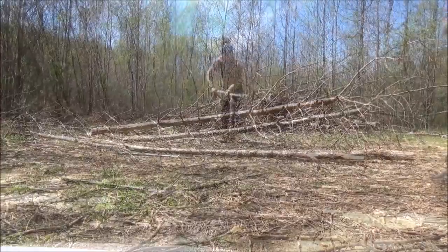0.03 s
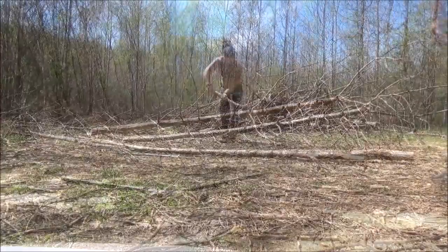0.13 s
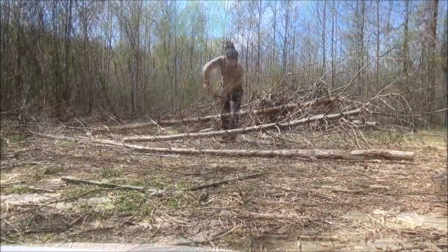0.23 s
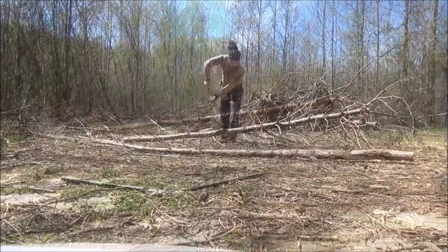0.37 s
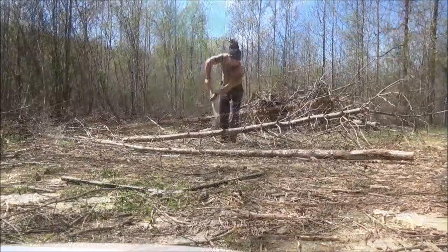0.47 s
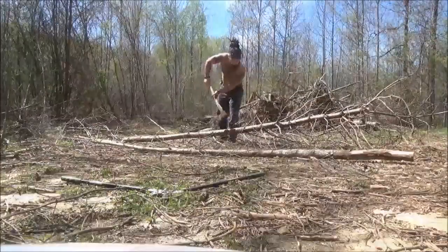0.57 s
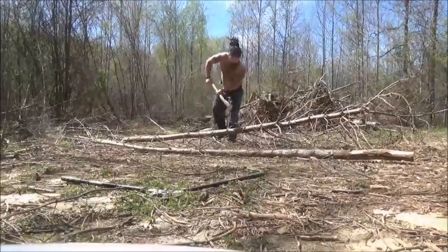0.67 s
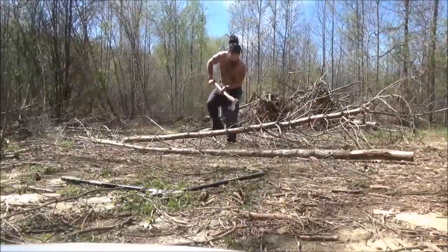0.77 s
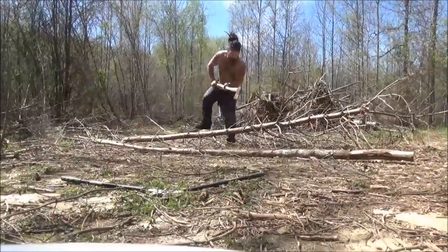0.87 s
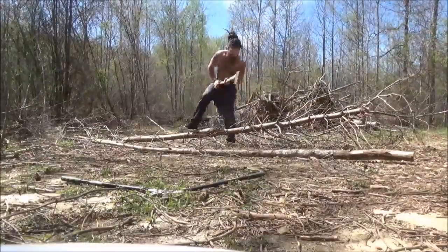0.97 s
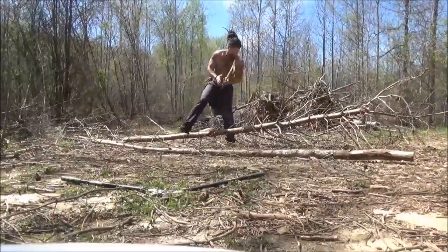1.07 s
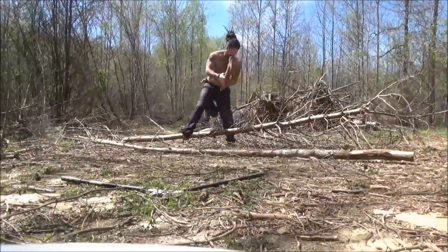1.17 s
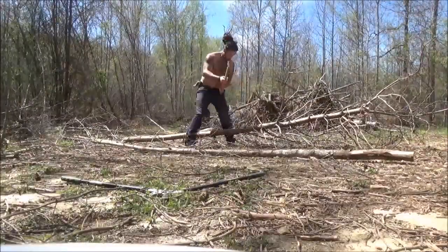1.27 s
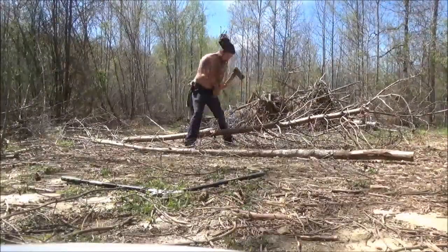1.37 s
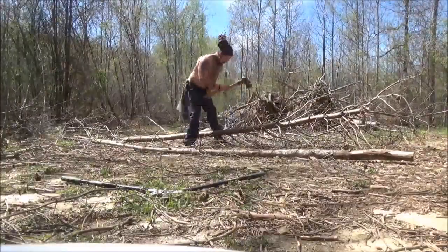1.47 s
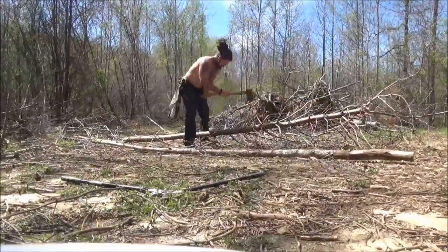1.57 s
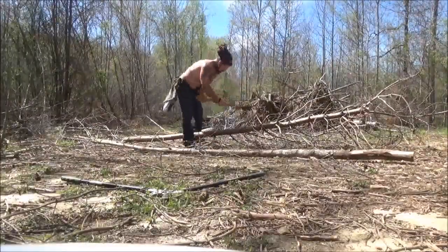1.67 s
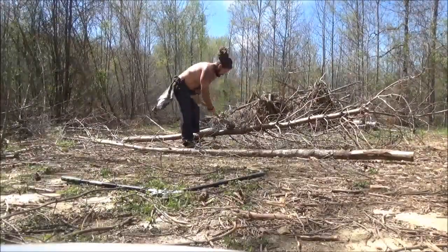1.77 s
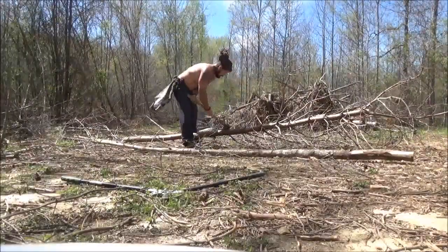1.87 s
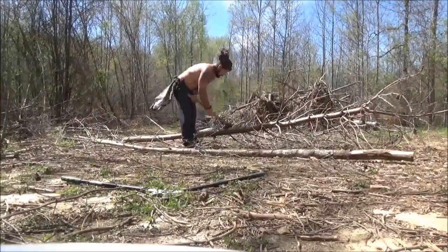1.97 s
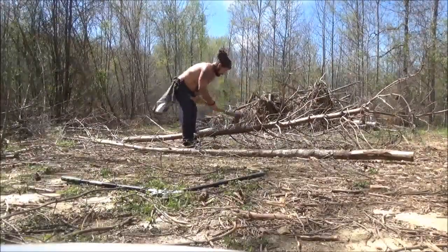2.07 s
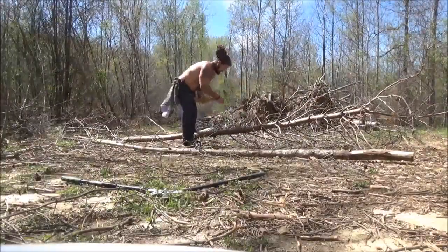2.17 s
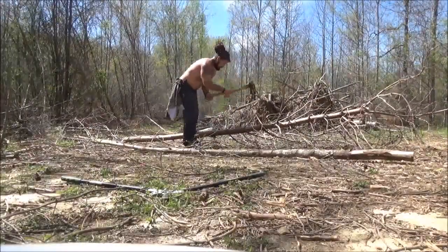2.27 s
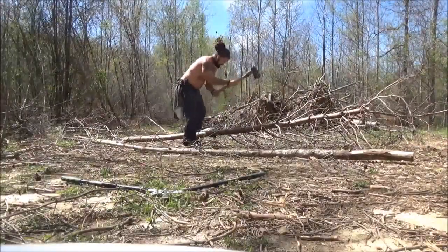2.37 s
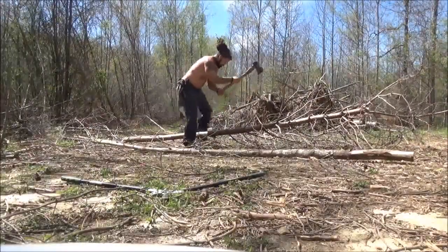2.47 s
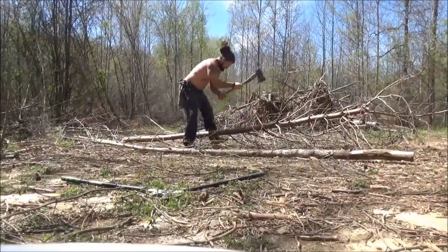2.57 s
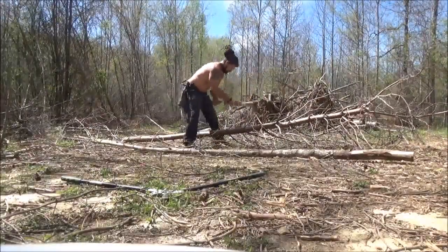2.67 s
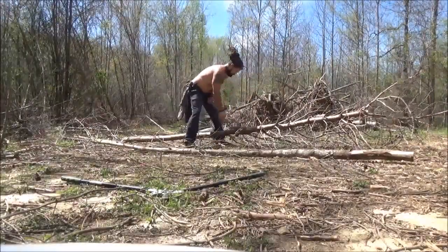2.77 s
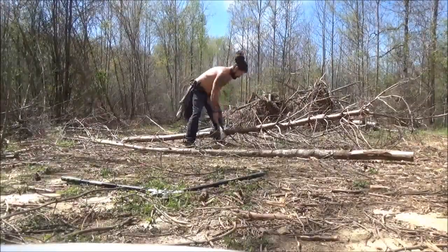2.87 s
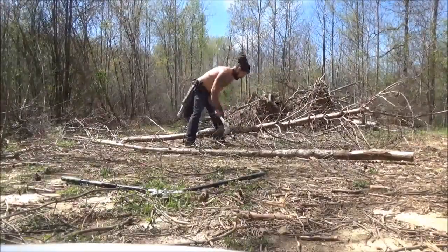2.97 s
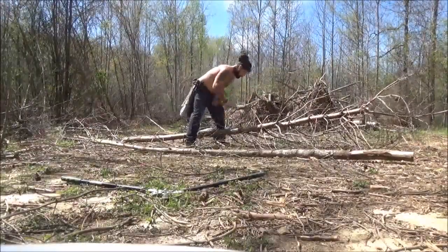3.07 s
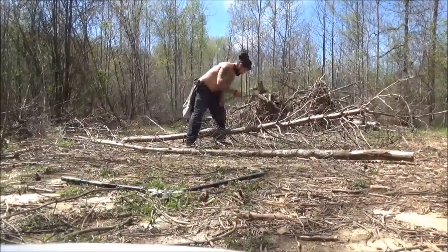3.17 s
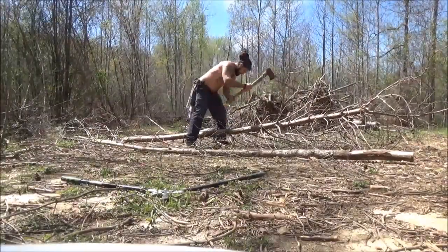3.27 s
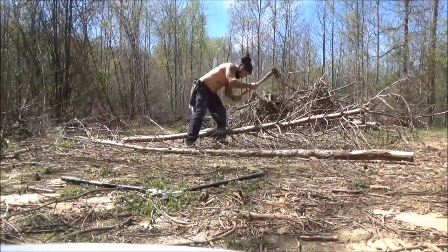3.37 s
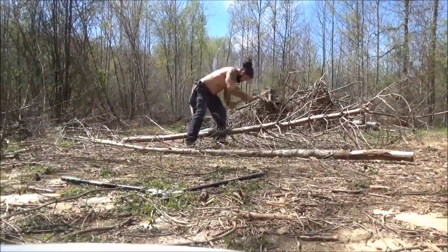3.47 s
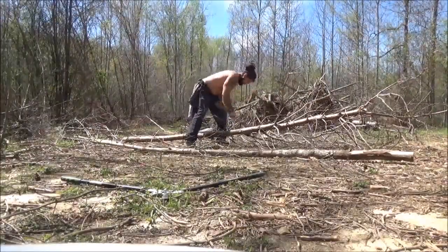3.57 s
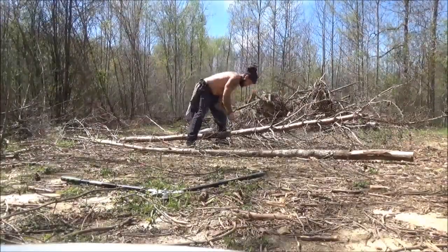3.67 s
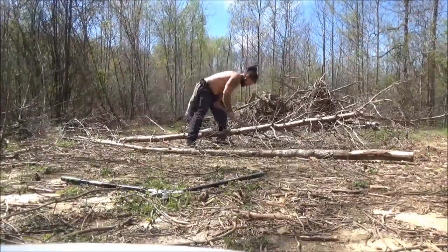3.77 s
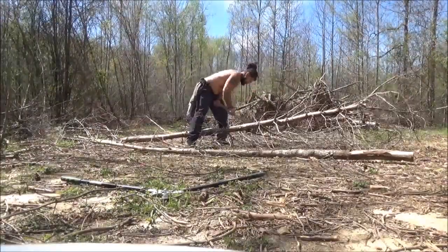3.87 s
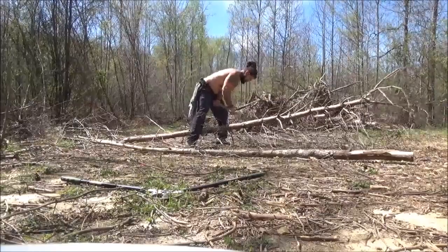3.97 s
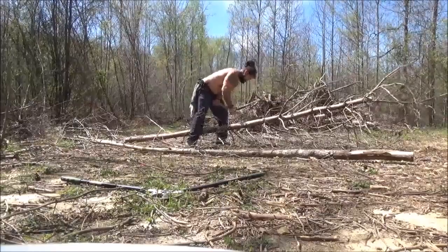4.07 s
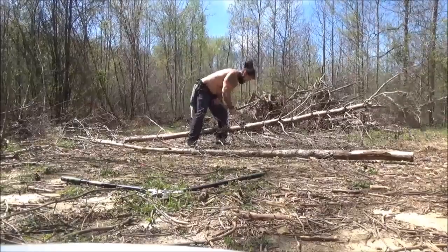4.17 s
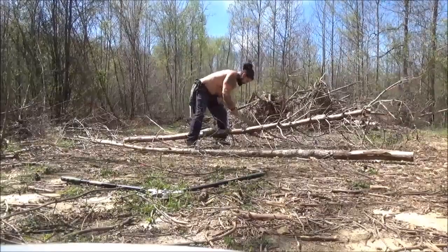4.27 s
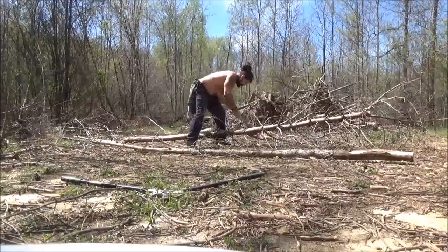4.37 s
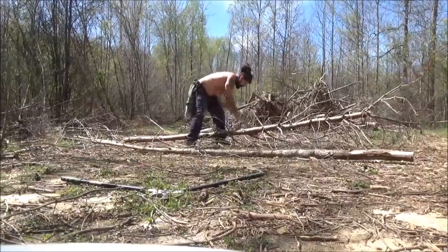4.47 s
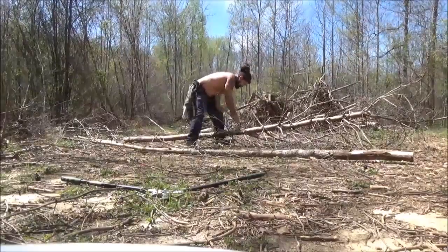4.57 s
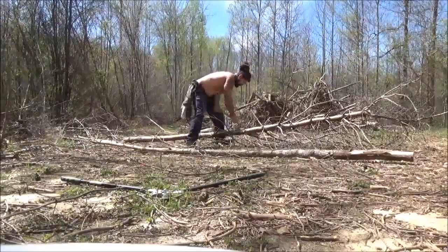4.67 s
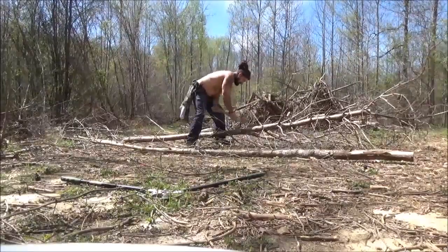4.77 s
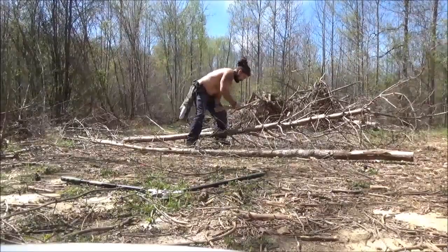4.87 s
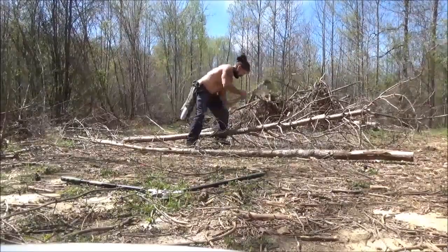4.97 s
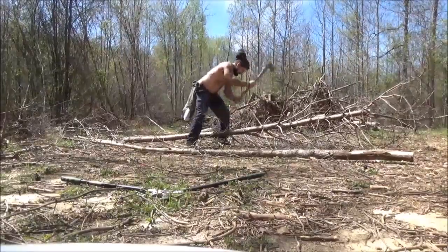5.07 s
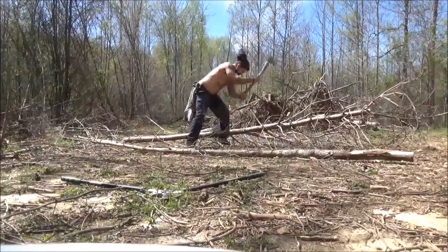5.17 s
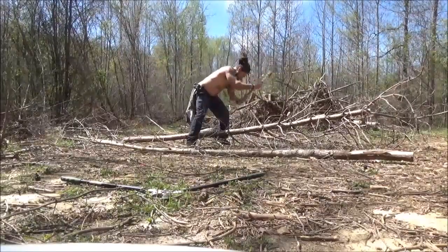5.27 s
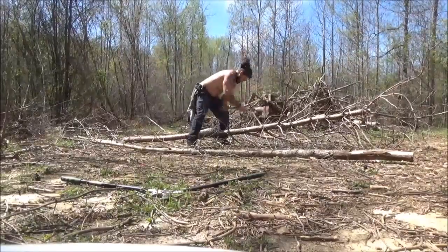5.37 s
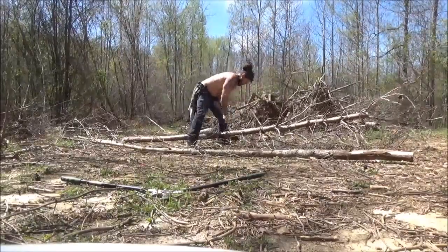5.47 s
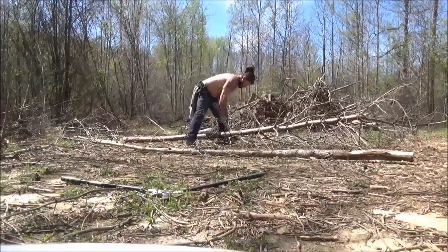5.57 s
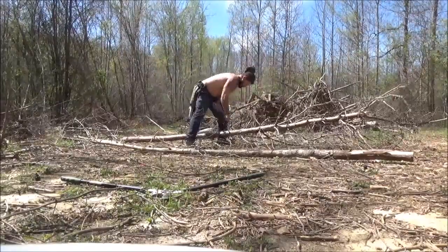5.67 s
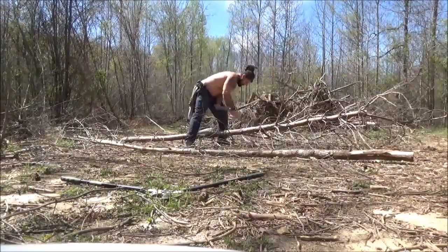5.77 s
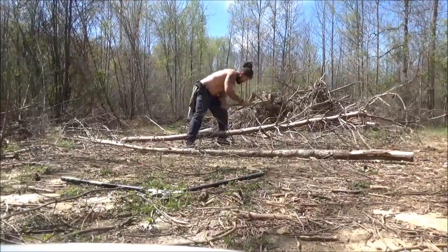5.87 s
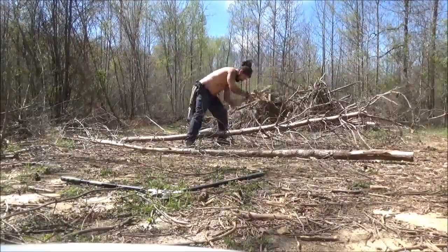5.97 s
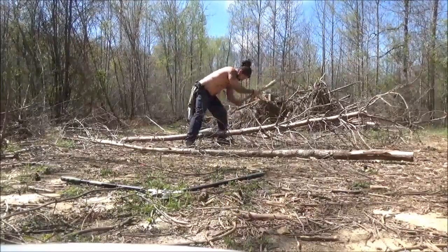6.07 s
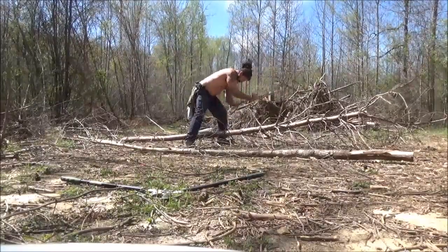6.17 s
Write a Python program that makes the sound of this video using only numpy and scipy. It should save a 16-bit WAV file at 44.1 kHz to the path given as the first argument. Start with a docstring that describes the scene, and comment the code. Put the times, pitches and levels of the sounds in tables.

```python
"""A man steps through dry brush in a forest clearing, with dull dry clicks close by, under still air and a low far hum.
He chops limbs off a felled tree: each blow is a burst of noise (torn fibres), then dying tones (the knocked limb).
The trees answer with a long wash of noise that follows the energy of each blow.
Between blows, twigs snap as short bursts, branches rustle as many tiny breaks, and loose limbs bump the ground.
The last blow lands as several bites close together, and the shaken branches die away."""
import sys
import numpy as np
from scipy import signal
from scipy.fft import rfft, irfft
from scipy.io import wavfile

SR = 44100
rng = np.random.default_rng(int(sys.argv[2]) if len(sys.argv) > 2 else 0)


def transcribe(signal):
    """Save signal, clipped to [-1, 1], as a 16-bit WAV file at the path in sys.argv[1]."""
    frames = np.atleast_2d(signal).T
    limited = np.clip(frames, -1, 1)
    pcm = np.round(limited * 32767).astype(np.int16)
    wavfile.write(sys.argv[1], SR, pcm)


N = 274302  # length in samples
EDGE_HZ = 11250  # upper limit of the sound band

# bites of the blade, some swings biting more than once; a first knock as the edge meets the wood, a full one as it stops:
# (start_s, echo_db, (crack_db, crack_length_s, crack_tilt_db_per_octave), (first_knock_db, first_pitch_hz),
#  (full_knock_db, full_pitch_hz, full_tilt_db_per_octave, trunk_share_db))
CHOPS = [(.2865, -2, (-30.5, 0.018, 0), (-14.5, 364), (-15.5, 878, 13, -16)), (1.834, -1, (-25, 0.013, 0),
         (-17.5, 640), (-12, 529, 4, -12)), (1.8525, -4.5, (-17.5, 0.0071, 0), (-24, 880),
         (-10, 846, 2.5, -13)), (2.8076, 1, (-16.5, 0.0086, 1), (-26, 1100), (-15, 937, 2, -1)),
         (3.6491, 7, (-13, 0.0034, 0.91), (-11.5, 1190), (-9, 803, -2, -10)),
         (5.498, -6, (-13.5, 0.0038, -4), (-15, 750), (-15, 638, 5, -23)),
         (5.5052, 4.5, (-15.5, 0.0058, 0.17), (-17, 740), (-9, 658, 17, -9.5)),
         (5.567, 4, (-23, 0.008, -1.1), (-36, 720), (-26, 640, -6, -13)),
         (5.5761, -16, (-21.5, 0.0044, -2.5), (-32, 550), (-17.5, 552, 3, -13))]


def amp(db):
    """Turns decibels into gain."""
    return 10 ** (np.asarray(db) / 20)


def evened(x):
    """Scales a signal to an average strength (rms) of 1."""
    return x / np.sqrt(np.mean(x ** 2) + 1e-20)


def read(points, hz):
    """Reads a table between its points, with frequency on a log axis as in hearing."""
    f, value = np.transpose(points)
    return np.interp(np.log(hz + 1), np.log(f), value)


def add(mix, s, sound):
    """Mixes a sound in at time s, cutting off what runs past the end."""
    part = mix[..., max(round(s * SR), 0):][..., :sound.shape[-1]]
    part += sound[..., :part.shape[-1]]


def panned(x, side_db):
    """Places a sound by its level difference between left and right; positive is left."""
    return x * amp([[side_db / 2], [-side_db / 2]])


def coloured(x, points):
    """Makes each frequency louder or softer by a spectrum table."""
    hz = np.fft.rfftfreq(x.shape[-1], 1 / SR)
    return irfft(rfft(x) * amp(read(points, hz)), x.shape[-1])


def scattered(pair):
    """Turns two unrelated signals into partly alike left and right, as sound from all around reaches two ears."""
    # likeness of the two ears: (pitch_hz, likeness from 0 to 1)
    ear_likeness = [(60, 1), (400, 0.93), (1000, 0.76), (2500, 0.72), (6000, 0.79), (11000, 0.73)]
    same = np.clip(read(ear_likeness, np.fft.rfftfreq(pair.shape[-1], 1 / SR)), 0, 1)
    mid, side = rfft(pair) * np.sqrt([(1 + same) / 2, (1 - same) / 2])
    return irfft(np.array([mid + side, mid - side]), pair.shape[-1])


def drift(rate_hz):
    """Makes a slow random wandering of rms 1 by keeping the low frequencies of noise."""
    hz = np.fft.rfftfreq(N, 1 / SR)
    return evened(irfft(rfft(rng.standard_normal(N)) * np.exp(-(hz / rate_hz) ** 2), N))


def ring(t, hz, t60):
    """One tone of a struck object, falling by 60 dB in t60 seconds."""
    return np.sin(2 * np.pi * hz * t) * amp(-60 * t / t60)


def background(hum_db=-1, waver=0.04, half_db=-14, air_db=-50.5):
    """Still forest air is coloured noise; the far hum is a wavering tone with a softer one at half its pitch."""
    # colour of the air before it is scaled to its level: (pitch_hz, level_db)
    air_colour = [(25, -21), (50, -4), (80, 1), (125, -5.5), (165, 4), (260, -5.5), (500, -11), (1000, -13),
                  (1600, -20.5), (3200, -20.5), (6000, -27), (11000, -27)]
    # course of the hum before hum_db and the flutter: (time_s, level_db)
    hum_course = [(0.0, -49), (0.8, -47), (0.87, -59.5), (2.46, -49.5), (3.15, -63), (3.26, -48),
                  (5.01, -49.5), (5.16, -64), (5.3, -48.5), (6.22, -52.5)]
    hum_hz = 109  # the pitch it wavers around
    air = evened(coloured(scattered(rng.standard_normal((2, N))), air_colour))
    air = air * amp(air_db + 0.61 * drift(9.9))
    phase = 2 * np.pi * np.cumsum(hum_hz * (1 + waver * drift(18.6))) / SR
    flutter_db = 2 * drift(18)
    course_db = np.interp(np.arange(N) / SR, *np.transpose(hum_course))
    level = amp(hum_db + course_db + flutter_db)
    tone = np.sin(phase) + amp(half_db) * np.sin(phase / 2)
    return air + np.sqrt(2) * level * tone


def low_tones(arch=0.3):
    """Soft sines swell and fade while their pitch glides evenly."""
    # faint low tones: (start_s, length_s, first_pitch_hz, last_pitch_hz, level_db at the fullest)
    glides = [(.1, .8, 129, 129.9, -49), (3.164, 0.108, 327, 206, -43)]
    out = np.zeros(N)
    for s, length, first_hz, last_hz, level_db in glides:
        u = np.linspace(0, 1, round(length * SR))  # progress from 0 to 1
        phase = 2 * np.pi * np.cumsum(first_hz * (last_hz / first_hz) ** u) / SR
        swell = abs(np.sin(np.pi * u)) ** arch
        add(out, s, np.sqrt(2) * amp(level_db) * swell * np.sin(phase))
    return out


def movement(rise_s=0.11, shaken_litter_db=-2.5):
    """Gains of rustle and crunch: shaken branches build up and die away, steps swell and fall."""
    # each swing sets the branches shaking: (start_s, rustle_db, fade_db_per_s)
    shakes = [(.286, -40, 23.5), (1.835, -46, 20), (2.8075, -41, 21.5), (3.6488, -37.5, 13),
              (5.498, -41.5, 16.5)]
    # boots press into the brush: (middle_s, half_length_s, twig_rustle_db, litter_crunch_db)
    steps = [(0.005, 0.12, -48, -40), (0.697, 0.07, -58, -38.5), (1.26, 0.089, -53.5, -66),
             (1.668, 0.047, -50.5, -40), (2.712, 0.047, -56, -51), (3.56, 0.048, -62, -58)]
    t = np.arange(N) / SR
    rustle = np.zeros(N)  # energies add up here; the root at the end makes gains
    for s, level_db, fade_db in shakes:
        shake = amp(level_db - fade_db * t) * (1 - np.exp(-(t / rise_s) ** 2))
        add(rustle, s, shake ** 2)
    crunch = rustle * amp(shaken_litter_db) ** 2
    for s, length, rustle_db, crunch_db in steps:
        press = np.exp(-((t - s) / length) ** 2)
        rustle += amp(rustle_db) ** 2 * press
        crunch += amp(crunch_db) ** 2 * press
    return np.sqrt(rustle), np.sqrt(crunch)


def grains(spectrum, per_s, clump_db, hiss):
    """Tiny breaks of uneven size arrive in clumps over a soft scrape of noise."""
    sizes = amp(3 * np.minimum(rng.exponential(1, (2, N)), 4))
    happens = rng.random((2, N)) < per_s / SR
    breaks = sizes * rng.choice([-1, 1], (2, N)) * happens
    texture = evened(breaks) + hiss * rng.standard_normal((2, N))
    texture = texture * amp(clump_db * drift(48))
    return evened(coloured(scattered(texture), spectrum))


def brush(rustle, crunch, twigs_db=-1.0, litter_db=-3):
    """Shaken branches rustle brightly; the litter crunches dully under the boots."""
    # colour of rustling twigs: (pitch_hz, level_db)
    twig_colour = [(300, -12.5), (1000, -2.5), (2000, 3), (3200, 3.5), (5000, 2), (6000, -3.5), (7000, 2.5),
                   (8300, -7), (10000, 0), (11500, -22)]
    # colour of crunching litter: (pitch_hz, level_db)
    litter_colour = [(50, -14), (120, 8.5), (300, 0), (550, 3), (1000, 3.5), (1700, -13.5), (2800, -12.5),
                     (6000, -22)]
    twigs = grains(twig_colour, per_s=2200, clump_db=2.5, hiss=1.0) * amp(twigs_db) * rustle
    litter = grains(litter_colour, per_s=900, clump_db=2.0, hiss=0.92) * amp(litter_db) * crunch
    return panned(twigs, side_db=-3.5) + panned(litter, side_db=0)


def chips(rustle, level_db=-5, per_s=110, size_db=1.5, cycles=26, low_hz=800, high_hz=9500, count=24):
    """Chips and twigs tick against each other as the brush shakes, each with two tones of its own."""
    out, t = np.zeros((2, N)), np.arange(2048) / SR
    for hz in np.geomspace(low_hz, high_hz, count):
        sizes = amp(size_db * np.minimum(rng.exponential(1, N), 3))
        hits = sizes * (rng.random(N) < per_s / count / SR)
        tick = ring(t, hz, cycles / hz) + ring(t, hz * rng.uniform(0.943, 1.5), cycles / hz)
        out += panned(signal.oaconvolve(hits, evened(tick))[:N], rng.uniform(-5.5, 5.1))
    return evened(out) * amp(level_db) * rustle


def scuffs(per_s=700, hiss=0.52, octaves=1.0, floor_db=-24, side_db=-1.0):
    """Each scuff is a swell of tiny breaks in one broad resonance, with a faint fizz above it."""
    # gritty scuffs: (middle_s, level_db, half_length_s, pitch_hz)
    scrapes = [(0.021, -39, 0.032, 810), (.054, -32.5, 0.0054, 1060), (0.186, -44, 0.061, 1230),
               (0.691, -39, 0.037, 1170), (1.379, -35, .016, 1160), (1.461, -39.5, 0.017, 1300),
               (1.649, -42, 0.0082, 850), (1.689, -36.5, 0.0085, 615), (2.702, -40.5, 0.011, 800),
               (2.96, -34.5, .012, 1300), (3.11, -39.5, 0.0039, 1270), (4.08, -42.5, 0.013, 930),
               (4.452, -38, .007, 1300)]
    out, t = np.zeros((2, N)), np.arange(-4096, 4096) / SR
    bins = np.fft.rfftfreq(len(t), 1 / SR) + 1
    for s, level_db, length, hz in scrapes:
        breaks = evened(rng.standard_normal((2, len(t))) * (rng.random(len(t)) < per_s / SR))
        grit = scattered(breaks + hiss * rng.standard_normal(breaks.shape))
        body = np.exp(-(np.log2(bins / hz) / octaves) ** 2) + amp(floor_db) * (bins > hz)
        swell = np.exp(-(t / length) ** 2 / 2)
        sound = amp(level_db) * evened(irfft(rfft(grit) * body)) * swell
        # drop whatever would fall before time zero
        add(out, max(s + t[0], 0), panned(sound[:, t >= -s], side_db))
    return out


def forest(x, build_s=0.0095, late_db=-21, late_t60=2.77, blur=0.05, flicker_db=1.42, size=256):
    """Countless trunks scatter the sound's energy into a wash that builds, falls fast, then lingers."""
    # fast part of the echo's fall: (pitch_hz, t60_s)
    wash_decay = [(200, 0.14), (700, 0.49), (1500, 0.41), (3500, 0.57), (7000, 0.68), (11000, 0.4)]
    # colour of the echo: (pitch_hz, level_db)
    echo_colour = [(50, -22), (170, 4.5), (400, -7), (800, -6), (1500, -3.5), (2400, -2.5), (3600, -4),
                   (6000, -6.5), (7000, -2.5), (8300, -8), (10500, -4)]
    hz, t, z = signal.stft(x, SR, nperseg=size)
    near = np.exp(-((hz[:, None] - hz) / (blur * hz[:, None] + 1)) ** 2)  # scattering smears fine spectral detail
    power = (near / near.sum(1, keepdims=True)) @ abs(z) ** 2
    decay = amp(-60 * t / read(wash_decay, hz)[:, None]) + amp(late_db - 60 * t / late_t60)
    energy = (decay * (1 - np.exp(-(t / build_s) ** 2))) ** 2
    # every moment of the sound starts its own decay
    wash = signal.fftconvolve(power, energy / energy.sum(1).mean(), axes=1)[:, :len(t)]
    flickering = scattered(rng.standard_normal((2, N))) * amp(flicker_db * drift(63))
    noise = signal.stft(flickering, SR, nperseg=size)[2]
    noise = noise / np.std(noise) * np.sqrt(abs(wash)) * amp(read(echo_colour, hz))[:, None]
    return signal.istft(noise, SR, nperseg=size)[1][:, :N]


def dry_clicks(cycles=3.14, upper=1.83, upper_db=-9, echo_db=-12):
    """Each click is a pair of tones damped within a few cycles."""
    # dull dry clicks close by: (start_s, peak_db before placing, pitch_hz, left_right_db)
    clicks = [(0.0333, -14, 780, -2.5), (.1698, -15, 990, -3.5), (.212, -28, 1150, -4),
              (.436, -22.5, 1390, -4), (.696, -21, 1280, -3), (.627, -30.5, 677, -2),
              (.6805, -17, 1190, -2), (0.719, -13.5, 1500, -4), (.765, -25, 1190, -2),
              (0.788, -25.5, 1230, -4), (1.253, -27.5, 1460, 3), (1.3567, -11.5, 1250, 1),
              (1.393, -13, 1020, -0.5), (1.466, -12.5, 1270, 0.5), (5.055, -30, 1230, 2),
              (5.276, -21.5, 950, 1.5), (5.679, -22.5, 1390, 0), (6.07, -26, 1830, 4.5)]
    out, t = np.zeros((2, N)), np.arange(1024) / SR
    for s, level_db, hz, side_db in clicks:
        click = ring(t, hz, cycles / hz) - amp(upper_db) * ring(t, hz * upper, cycles / hz)
        click = click * (1 - np.exp(-t * hz * 2))  # soft start
        add(out, s, panned(amp(level_db) * click / abs(click).max(), side_db))
    return out + amp(echo_db) * forest(out.mean(0))


def crack(level_db, length, tilt_db, after_db=-16, after_s=0.016):
    """Fibres tear in a dense burst a few milliseconds long; splinters trail off."""
    # colour of tearing fibres before the tilt: (pitch_hz, level_db)
    fibre_colour = [(50, -34), (150, 1), (400, 9.5), (1000, 6), (1800, -2), (3200, 5), (5500, 0),
                    (7200, -1.5), (8500, 1), (10500, -3)]
    t, hz = np.arange(2048) / SR, np.fft.rfftfreq(2048, 1 / SR)
    tear = np.exp(-(t / length) ** 4)
    trail = amp(after_db) * np.exp(-t / (length + after_s))
    shape = (1 - np.exp(-t / 0.000083)) * (tear + trail)
    burst = rng.standard_normal(len(t)) * shape
    treble_tilt = tilt_db * np.log2(np.clip(hz, 500, None) / 3000)
    colour = amp(read(fibre_colour, hz) + treble_tilt) * (hz < EDGE_HZ)
    burst = irfft(rfft(np.roll(burst, 32)) * colour)  # begins 32 samples late
    return amp(level_db) * evened(burst) * np.sqrt(length / t[-1])  # a longer tear has more energy


def splinters(level_db=-23, per_s=130, size_db=2.5, fade_db=45, tilt_db=-1.0, count=8):
    """Splinters fly from each bite and patter through the brush as tiny cracks that die away."""
    t, strength, out = np.arange(N) / SR, np.zeros(N), np.zeros((2, N))
    for s, _, (crack_db, _, _), _, _ in CHOPS:
        add(strength, s, amp(crack_db - fade_db * t) ** 2)
    for _ in range(count):
        sizes = amp(size_db * np.minimum(rng.exponential(1, N), 3))
        hits = sizes * (rng.random(N) < per_s / count / SR)
        tick_tilt_db = tilt_db + rng.uniform(-4.5, 3.9)
        tick = crack(level_db, length=0.0008, tilt_db=tick_tilt_db, after_db=-26, after_s=.004)
        out += panned(signal.oaconvolve(hits * np.sqrt(strength), tick)[:N], rng.uniform(-5, 3))
    return out


def knock(level_db, hz, t60, tilt_db, trunk_db, rise_s=0.0025, low_hz=130):
    """The blade pushes the limb, which rings briefly and shakes the trunk; the knock carries no deep bass."""
    # tones of a limb before the tilt: (multiple of its pitch, level_db)
    limb_tones = [(.27, -10), (.45, -6), (.58, 0), (.79, -3.5), (1, 5), (1.17, -7.5), (1.36, -7.5),
                  (1.75, -27.5)]
    # tones of the trunk before a small random shift of pitch: (pitch_hz, level_db, t60_s)
    trunk_tones = [(160.5, -8, 0.059), (208.4, -9, 0.086), (394.3, -3, 0.16), (494, -11, 0.19),
                   (556, -19, 0.32), (635, -6.5, 0.069), (920, 1, 0.054), (1246, -26, 0.11)]
    t = np.arange(SR // 3) / SR
    limb, trunk = np.zeros(len(t)), np.zeros(len(t))
    for k, (ratio, db) in enumerate(limb_tones):
        sign = (-1) ** k  # neighbouring tones start in opposite directions
        limb += sign * amp(db + tilt_db * np.log2(ratio)) * ring(t, hz * ratio, t60)
    for f, db, decay in trunk_tones:
        trunk += amp(db) * ring(t, f * rng.uniform(0.94, 1.01), decay)
    wood = (limb + amp(trunk_db) * trunk) * (1 - np.exp(-t / rise_s))
    return amp(level_db) * signal.lfilter(*signal.butter(2, low_hz, "high", fs=SR), wood)


def metallic_tone(hz, level_db, t60, rough=0.59, waver_hz=70):
    """A high metallic tone dies away, its phase and level wandering at random."""
    t = np.arange(SR // 2) / SR
    phase = 2 * np.pi * hz * t + rough * drift(waver_hz)[:len(t)]
    uneven = np.exp(rough / 2 * drift(waver_hz)[:len(t)])
    return amp(level_db - 60 * t / t60) * np.sin(phase) * uneven


def chopping(crack_side_db=-1.0, knock_side_db=1.8, spread=0.22):
    """Each bite is a crack and a double knock; twigs snap, limbs bump, the axe head sings and the trees echo."""
    # twigs snap: (start_s, level_db, length_s, treble_tilt_db_per_octave, echo_db)
    snaps = [(0.328, -36.5, 0.015, -1, 3), (1.3538, -31, 0.0052, 9, -6), (1.391, -30.5, 0.0044, 0.5, -2.5),
             (1.464, -34, 0.0039, 0.5, -21), (1.899, -26, 0.0013, 13, -16), (2.8545, -30, 0.003, 4, -10),
             (2.913, -32.5, 0.011, 3.5, -19), (4.222, -24.5, 0.0029, 9.5, -10),
             (4.286, -33.5, 0.012, 7, 1.5), (4.32, -26, .0036, 5.5, -0.5), (4.376, -37.5, 0.019, 1.5, 2),
             (4.443, -36, 0.0039, 8, -8), (4.633, -41, 0.013, 0, 6)]
    # loose limbs bump on the ground: (start_s, level_db, limb_pitch_hz)
    bumps = [(2.956, -31, 772), (4.446, -37, 860), (4.773, -34, 678)]
    # the axe head sings after a blow: (start_s, pitch_hz, level_db before the wandering, t60_s)
    axe_rings = [(1.836, 2630, -16.5, 0.018), (1.839, 2387, -44, 0.44), (1.857, 2385, -21, 0.11),
                 (1.854, 3030, -36, 0.12), (3.65, 7100, -42, 0.23), (5.499, 9900, -28.5, 0.33)]
    stop_s = 0.00525  # from the edge meeting the wood to the blade stopping
    knock_echo_db = -11.5  # added to the echo level of every knock
    direct, sent = np.zeros((2, N)), np.zeros(N)  # heard straight; sent to the trees
    cracks, knocks = list(snaps), []
    for s, level_db, hz in bumps:
        knocks.append((s, knock(level_db, hz, t60=0.046, tilt_db=-1, trunk_db=-12.5), 0))
    for s, echo_db, fibres, (first_db, first_hz), (full_db, full_hz, tilt_db, trunk_db) in CHOPS:
        cracks.append((s, *fibres, echo_db))
        knocks.append((s, knock(first_db, first_hz, t60=0.02, tilt_db=6.5, trunk_db=-24), echo_db))
        knocks.append((s + stop_s, knock(full_db, full_hz, 0.025, tilt_db, trunk_db), echo_db))
    for s, level_db, length, tilt_db, echo_db in cracks:
        sound = crack(level_db, length, tilt_db)
        # a second burst, opposite in the two ears, widens the crack
        width = spread * crack(level_db, length, tilt_db) * np.array([[1], [-1]])
        add(direct, s, panned(sound + width, crack_side_db))
        add(sent, s, amp(echo_db) * sound)
    for s, sound, echo_db in knocks:
        add(direct, s, panned(sound, knock_side_db))
        add(sent, s, amp(echo_db + knock_echo_db) * sound)
    for s, hz, level_db, t60 in axe_rings:
        add(direct, s, metallic_tone(hz, level_db, t60))
    return direct + forest(sent)


def scene():
    """Adds up everything heard in the clearing."""
    rustle, crunch = movement()
    work = chopping() + dry_clicks() + scuffs() + brush(rustle, crunch) + chips(rustle) + splinters()
    return work + background() + low_tones()


def record(dry):
    """Rounds off the loudest peaks, then removes what lies above the band limit."""
    ceiling = .7
    rounded = ceiling * np.tanh(dry / ceiling)
    low_pass = signal.firwin(401, EDGE_HZ, window=("kaiser", 8), fs=SR)
    return signal.oaconvolve(rounded, low_pass[None], "same")


dry = scene()
out = record(dry)
transcribe(out)
```